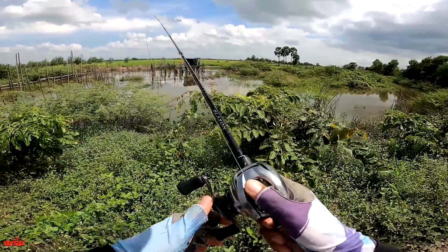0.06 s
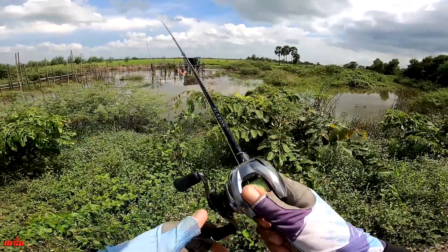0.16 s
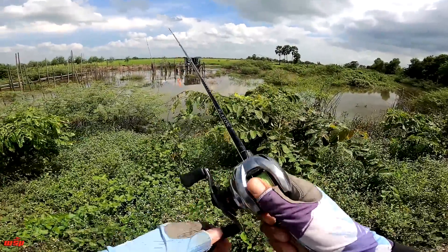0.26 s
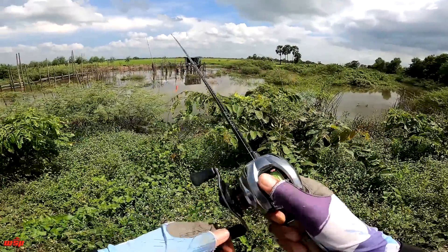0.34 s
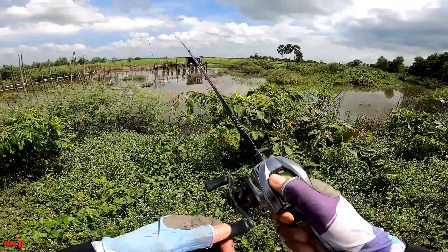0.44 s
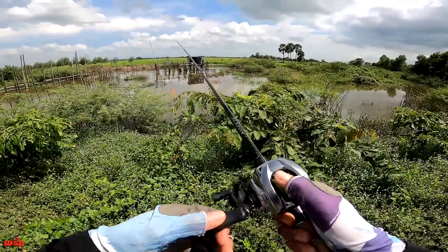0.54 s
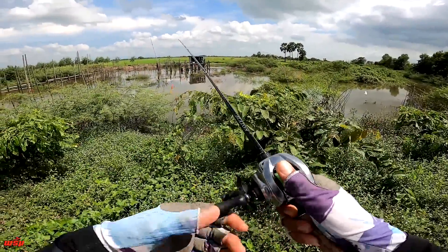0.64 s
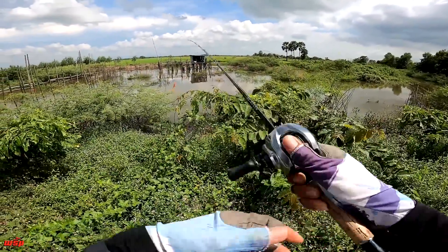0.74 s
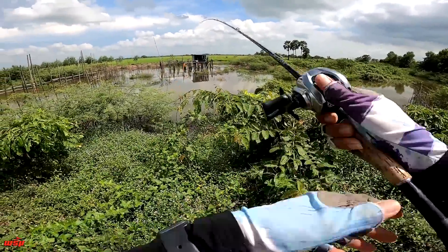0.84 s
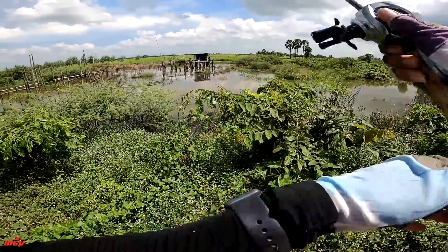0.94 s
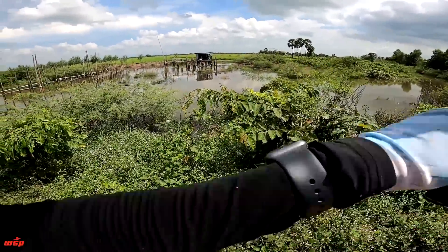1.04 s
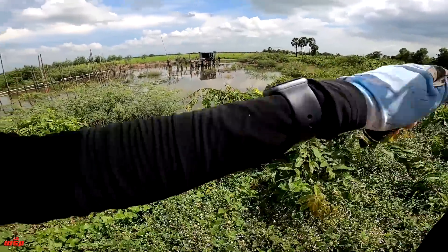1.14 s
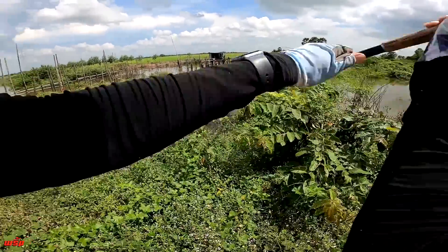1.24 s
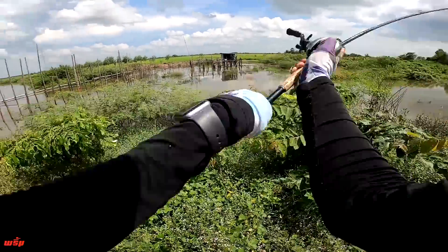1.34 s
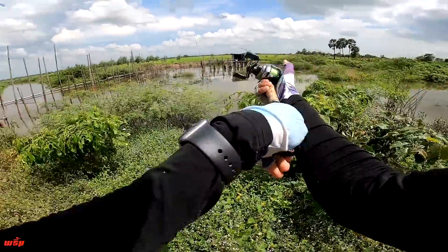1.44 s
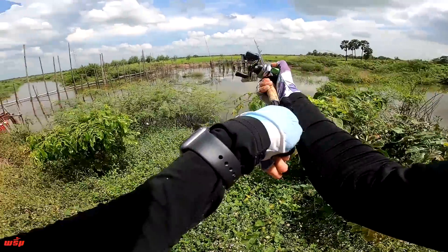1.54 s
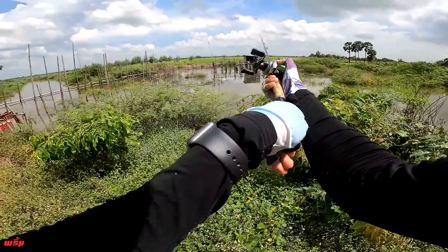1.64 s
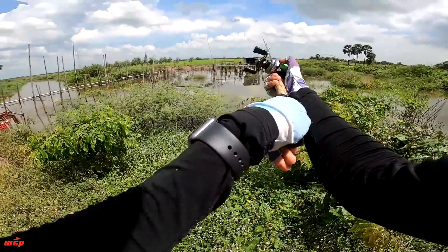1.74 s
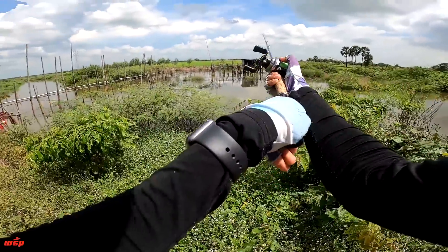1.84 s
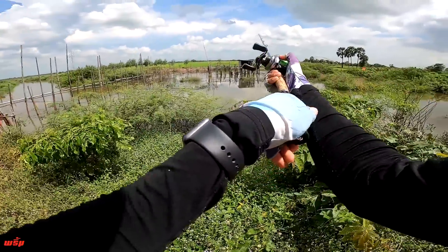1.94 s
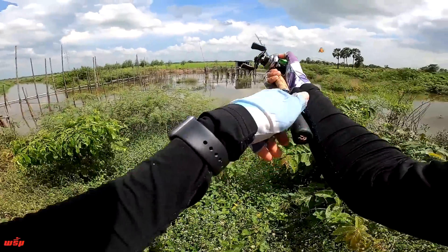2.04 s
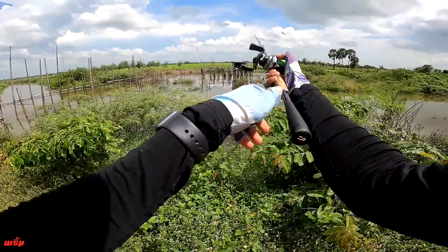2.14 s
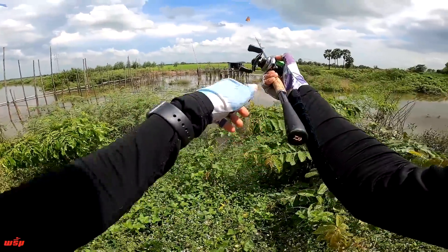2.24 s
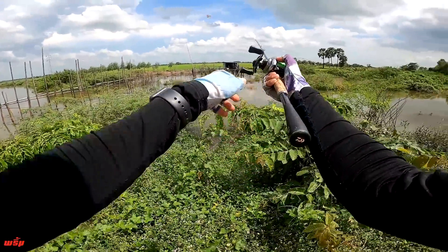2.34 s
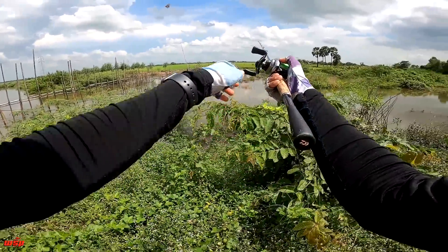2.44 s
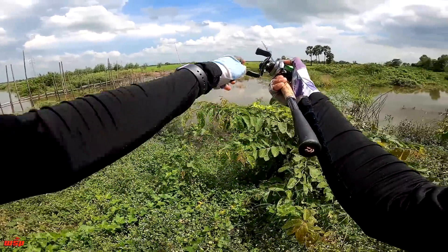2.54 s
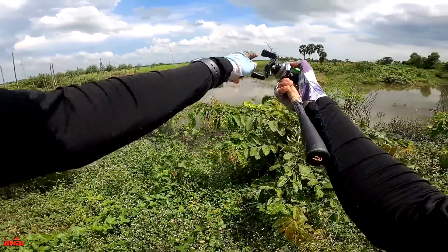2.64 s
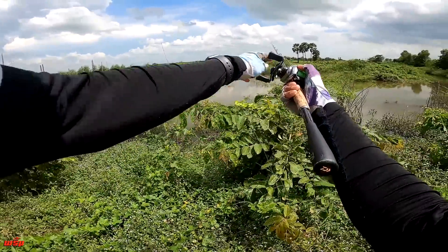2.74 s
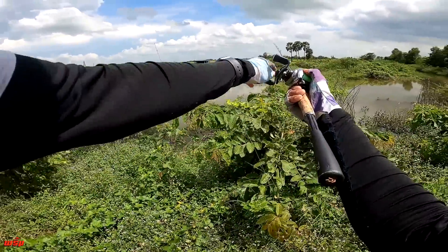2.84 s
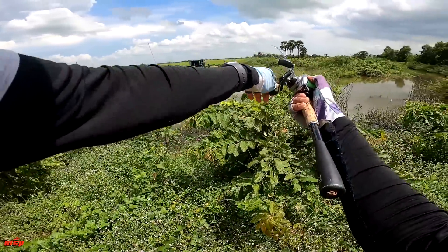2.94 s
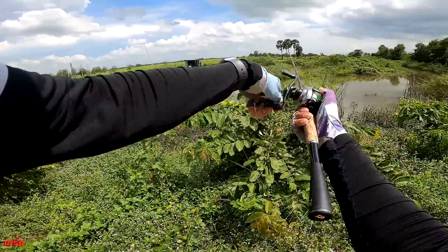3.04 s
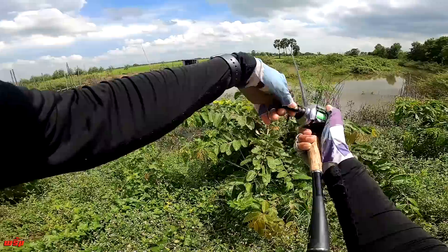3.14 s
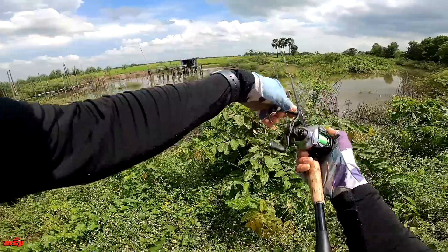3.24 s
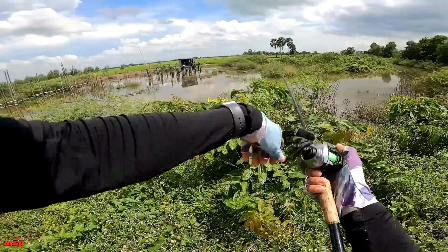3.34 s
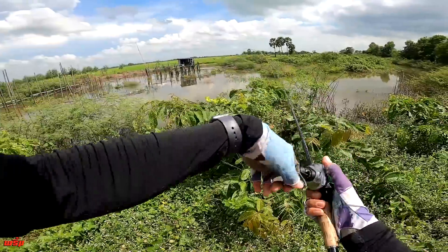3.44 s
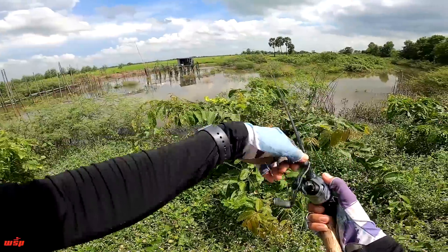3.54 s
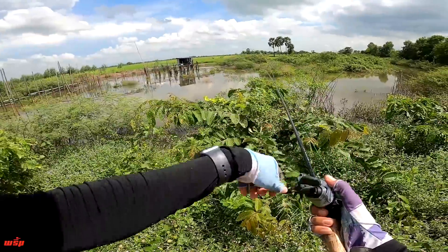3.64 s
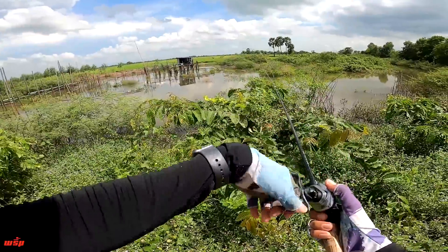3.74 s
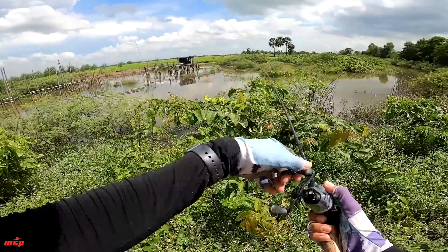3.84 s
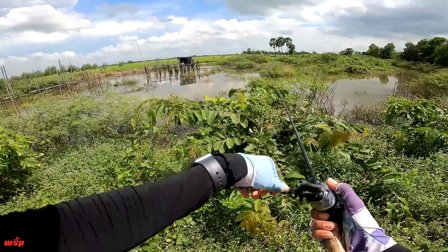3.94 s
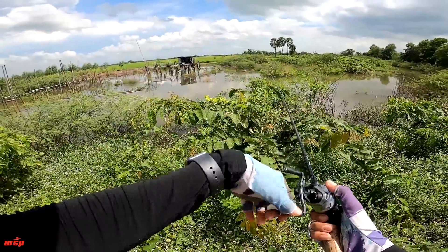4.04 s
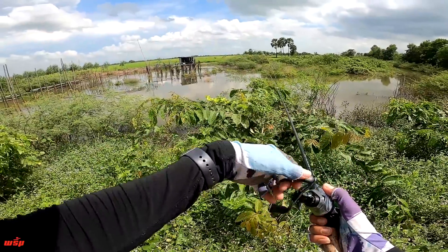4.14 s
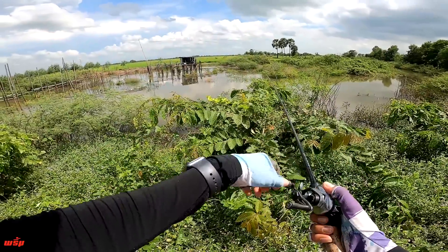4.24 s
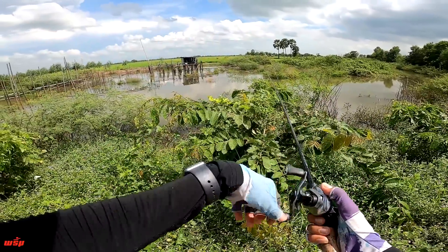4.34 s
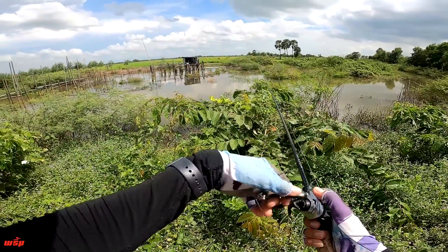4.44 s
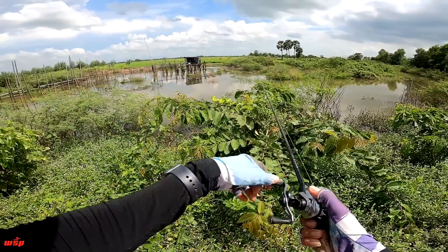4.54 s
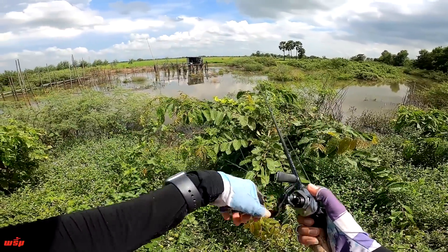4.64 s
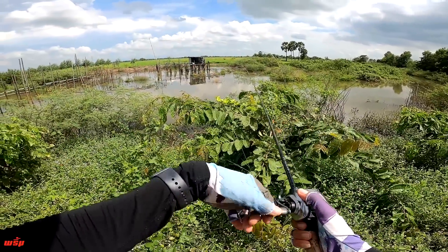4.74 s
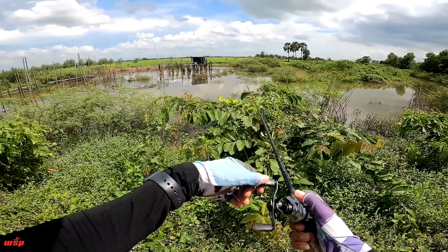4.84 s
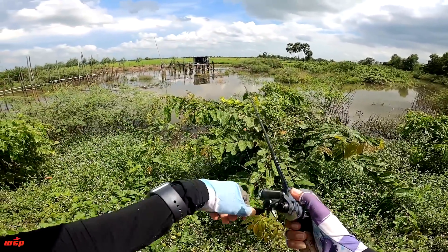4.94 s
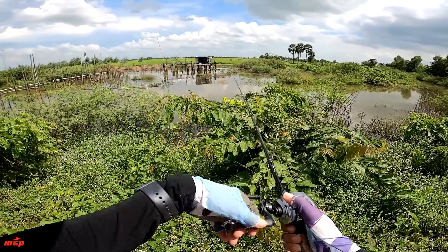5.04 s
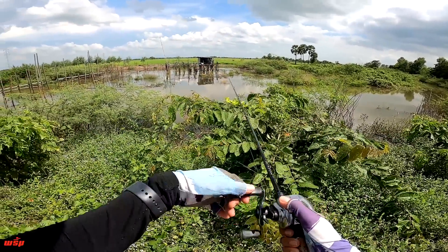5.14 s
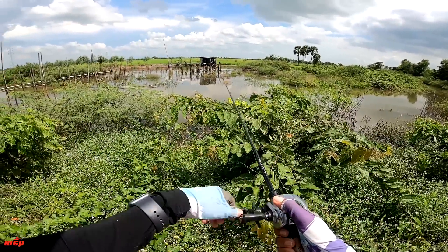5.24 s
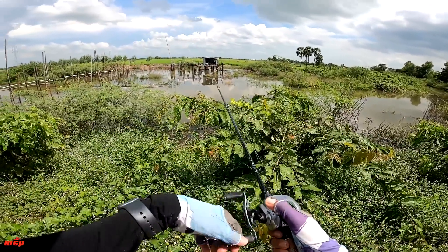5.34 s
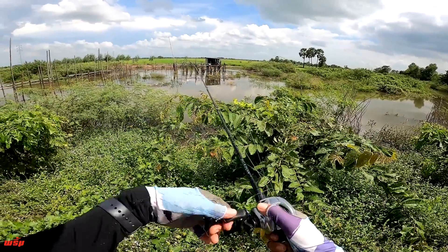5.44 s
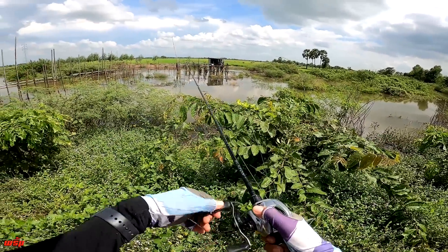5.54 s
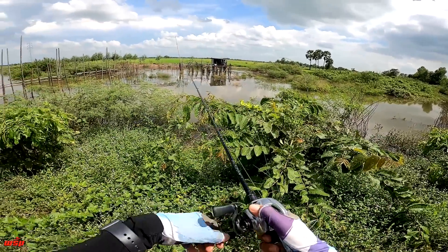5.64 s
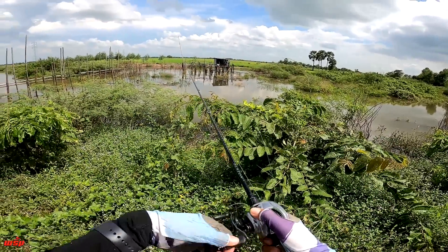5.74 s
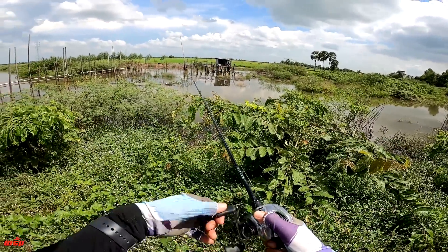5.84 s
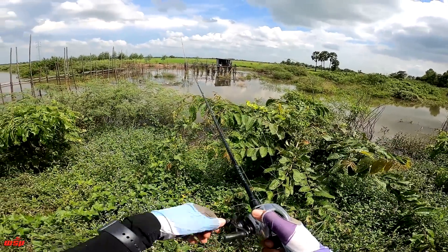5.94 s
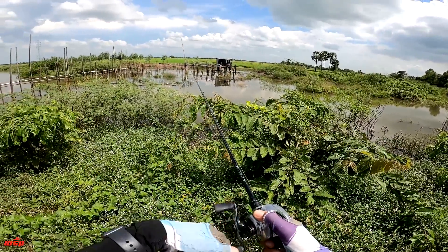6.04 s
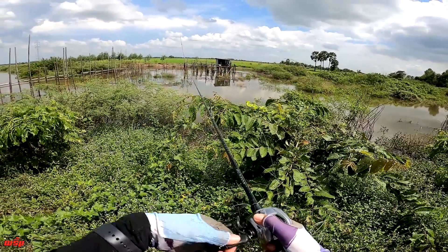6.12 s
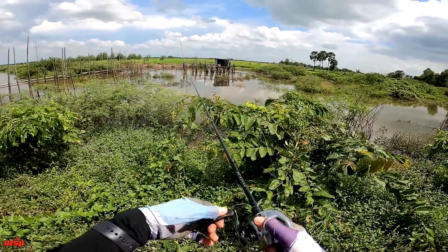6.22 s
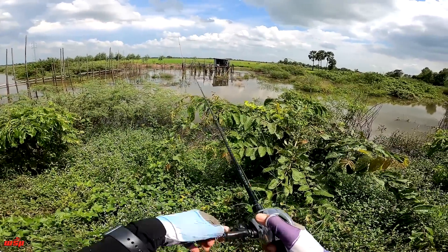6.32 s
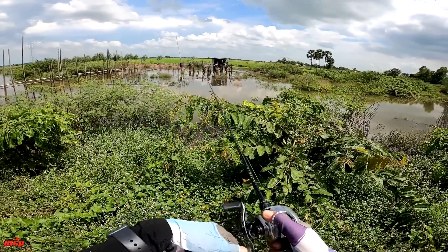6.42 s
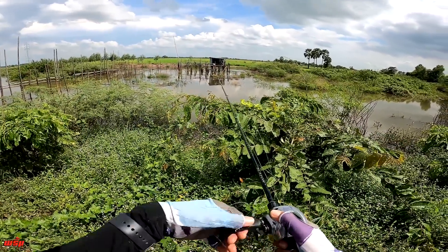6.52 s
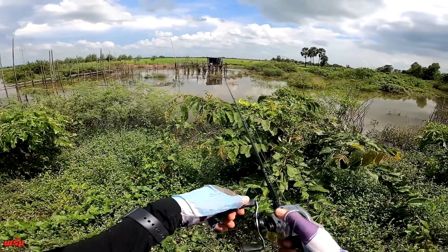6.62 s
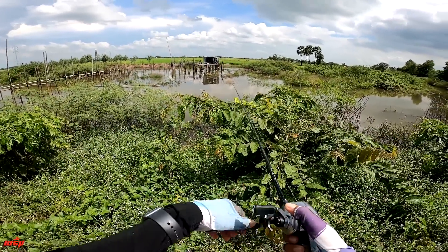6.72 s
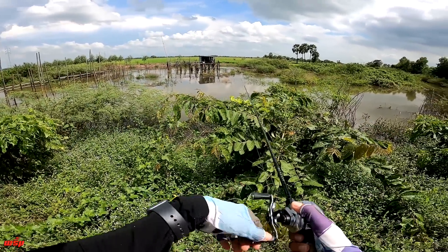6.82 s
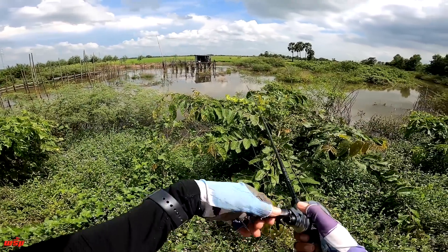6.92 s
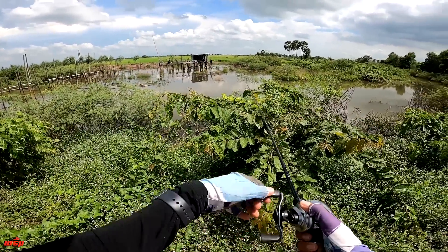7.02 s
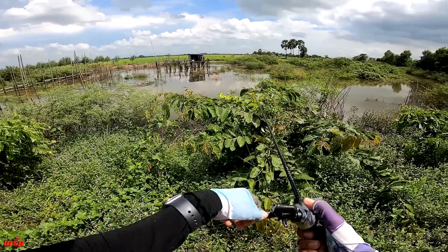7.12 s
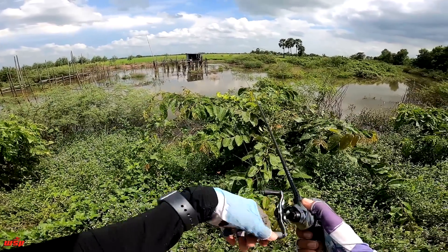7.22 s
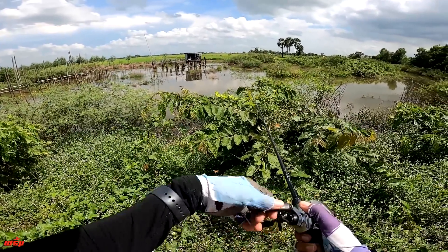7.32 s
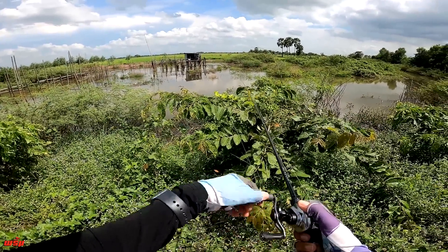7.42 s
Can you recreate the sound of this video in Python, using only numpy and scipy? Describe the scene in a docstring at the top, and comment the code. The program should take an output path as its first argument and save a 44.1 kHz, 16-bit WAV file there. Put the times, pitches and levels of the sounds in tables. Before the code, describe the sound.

Sharp reel clicks, a rod swish and a whirring spool slowing down, then a quiet hissing retrieve with faint birds and breeze by a marsh.

```python
"""Bank of a marsh, microphone at the angler's chest: a lure is cast with a baitcasting reel close in front.
Clicks into free spool and back into gear are short forces that ring the reel's body; the rod's swish is a
rising band of noise; the spool is a slowing hum with rasping line; the slow retrieve hisses and whines.
Sleeves, glove and breeze are shaped noise. Small birds far off are gliding sines, insects narrow drones."""
import sys
import numpy as np
from scipy import signal
from scipy.io import wavfile

SR = 44100
rng = np.random.default_rng(int(sys.argv[2]) if len(sys.argv) > 2 else 0)


def to_wav(sig):
    """Store sig (one row per channel, or 1-D mono) as 16-bit WAV at the path in sys.argv[1].

    Samples outside -1..1 are clipped; the rate is SR.
    """
    pcm = np.clip(np.atleast_2d(sig), -1, 1) * 32767
    pcm = np.round(pcm).astype(np.int16)
    wavfile.write(sys.argv[1], SR, pcm.T)  # frames by channels


N = 329603
TIME = np.arange(N) / SR
CUTOFF_HZ = 15500

# Noise spectra, relative: hz, level_db (per Hz)
# low wind on the microphone
RUMBLE = [(12, -40), (20, -11), (86, 3), (162, -7), (198, 2), (250, -13), (320, -52), (550, -120)]
# dull air and cloth
MURMUR = [(82, -24), (140, -4.5), (178, -2.5), (254, 0), (425, -2), (551, -2.5), (819, -5.5), (1120, -11.5),
          (1500, -12), (1950, -39), (3300, -120)]
# leaves and dry rustle
LEAVES = [(650, -24), (1100, -14.5), (1420, -6.5), (1710, 3.5), (1880, -3), (2430, 3), (2770, -2.5),
          (3510, 1), (4450, 0), (4990, 1), (5850, -9), (8170, -18), (9000, -23), (11700, -59),
          (19800, -120)]
# bright swish of a sleeve
SLEEVE = [(900, -1.5), (2000, 3), (4000, 3), (5500, -2), (7000, 1), (8500, -11.5), (10000, -14.5),
          (12000, -21), (15000, -24)]
# Left-right likeness of the surroundings: hz, correlation (1 = same in both channels)
LIKENESS = [(30, 1), (4000, 1), (8000, 1), (11000, 0.96), (14000, 0.31)]
# Arm movements at the microphone: start_s, end_s, bright_swish_db, dry_rustle_db, dull_rub_db
ARM_MOVES = [(0, 0.29, -67, -56, -46.5), (.55, 0.85, -44.5, -45.5, -47), (1.1, 1.328, -52, -46.5, -55.5),
             (1.58, 2.29, -55, -50.5, -50), (2.64, 2.98, -52, -50.5, -51), (3.27, 3.33, -52, -51, -62),
             (4.607, 4.76, -54, -54.5, -62), (5.007, 5.084, -59, -53.5, -57), (6.85, 7.1, -56, -71, -70)]
# Puffs of wind on the microphone: start_s, end_s, level_db
GUSTS = [(0, .8, -55.5), (2.23, 2.88, -52.5), (2.76, 2.82, -50), (4.2, 4.38, -59.5), (5.35, 5.82, -55),
         (6.28, 7.4, -58)]
# Still air between the puffs
CALM_RUMBLE_DB, CALM_MURMUR_DB, CALM_LEAVES_DB = -60, -55, -53.5

# Spells of winding: start_s, end_s, level_at_start_db
WINDING = [(0, 0.294, -45), (3.215, 7.47, -48)]
WINDING_EASE_DB_PER_S = 3
# Far drones, mostly of insects: start_s, end_s, pitch_hz, width_hz, level_db
INSECTS = [(0, 0.44, 4490, 130, -54.5), (3.85, 5.2, 4510, 130, -58.5), (4.605, 6.7, 2435, 130, -68.5),
           (6.778, 7.267, 2464, 53, -58.5), (7.244, 7.596, 4470, 90, -61), (4.6, 5.2, 545, 5.4, -62),
           (6.753, 7.35, 541, 5.8, -61)]
# Thin, very high squeals: start_s, length_s, start_hz, middle_hz, end_hz, level_db
SQUEALS = [(0, 0.18, 14300, 13700, 14100, -73), (1.83, 0.24, 13000, 13200, 12400, -72),
           (3.63, 0.33, 11700, 11500, 12600, -70.5), (3.88, 0.18, 12400, 11500, 10200, -69),
           (3.63, 0.36, 13300, 13400, 14040, -76), (3.72, 0.22, 12600, 12200, 11700, -69),
           (5.83, .19, 12300, 13600, 11600, -81), (6.08, .29, 11700, 12400, 12300, -81)]
# Glove brushing the crank and the rod butt: start_s, end_s, level_db
BRUSHES = [(0, .09, -46.5), (3.7, 4.1, -55), (5.85, 6.38, -54), (7.27, 7.35, -61.5)]
# Crank taking up load: start_s, end_s, starting_pitch_hz, level_db
CRANK_LOADS = [(0.25, 0.273, 2810, -39), (3.245, 3.326, 2755, -41), (3.47, 3.49, 3160, -43.5),
               (3.976, 4.023, 3350, -53)]
WHINE_RISE_HZ_PER_S = 3000

# Snaps and ticks of the reel: start_s, level_db (over 5 ms), ring_hz, ring_boost_db, chatter_s, frame_boom_db
CLICKS = [(0.2786, -15, 4300, 9, 0.00068, 1), (0.2793, -17, 2700, 11, 0.0011, 6),
          (.343, -40, 1000, 6, 0.0023, 22), (0.374, -43, 2880, 14, .002, 4),
          (.481, -38, 3000, 0, 0.00092, -11), (.521, -27.5, 2500, 7, 0.0012, 7),
          (.5266, -16, 2550, 10, 0.00087, 15), (.5424, -9.5, 1790, 9.5, 0.0014, -1),
          (0.5444, -14, 2020, 4, 0.0016, 1), (0.5463, -14, 3670, 0, 0.00087, 5.5),
          (0.794, -43, 2500, 2, 0.00074, 9), (.824, -16.5, 2940, 4, 0.0026, 4),
          (.845, -37, 2000, 14, 0.0011, 10), (1.3988, -32, 3320, 11, 0.0012, 8),
          (3.002, -34, 2900, 14, 0.0014, -4), (3.01, -32, 2980, 14, .0018, 2),
          (3.054, -30, 4230, 4, 0.0056, -2), (3.0746, -15, 4400, 7, 0.00053, 4),
          (3.085, -17, 4890, 8, 0.00091, 0), (3.0884, -14.5, 4570, 8, 0.0031, 0.5),
          (3.181, -15.5, 2880, 15, 0.00081, -3), (3.1819, -10.5, 3500, 14, 0.00073, -2),
          (3.1837, -13.5, 3000, 9, 0.00048, -4), (3.4515, -36.5, 5160, 8, 0.00073, -8),
          (3.465, -41, 4200, 8, 0.00097, -4), (4.563, -47, 5600, 21, 0.0011, -5)]
# Resonances of the reel's body: pitch_hz, width_hz, level_db (relative)
REEL_MODES = [(1630, 163, -1.5), (1850, 145, 1), (2070, 160, -5.5), (2330, 170, -0.5), (2610, 175, 0),
              (3010, 170, -1), (3630, 194, 3), (4050, 220, -0.5), (4600, 260, -3), (5100, 270, -3.5),
              (5620, 390, -9), (6500, 320, -6.5), (7490, 380, -10), (8430, 580, -13), (11200, 2300, -21.5)]
FRAME_HZ, FRAME_WIDTH_HZ = 850, 124

# The rod's swing: span at full level, then time constants of its rise and fall
SWING_FROM_S, SWING_TO_S, SWING_RISE_S, SWING_FALL_S = 1.4565, 1.502, 0.013, 0.027
# The air tone climbs from low to high pitch around the moment the rod whips through
SWING_LOW_HZ, SWING_HIGH_HZ, WHIP_S, WHIP_LENGTH_S = 780.5, 1983, 1.464, .011

# The spool: launch, top speed, and how fast its sound builds
LAUNCH_S, TOP_TURNS_PER_S, SPOOL_RISE_S = 1.49, 371, 0.0066
# It coasts, is braked harder, and falls silent after the stop: moments and time constants of slowing
BRAKE_S, STOP_S, COAST_DECAY_S, BRAKED_DECAY_S = 1.70, 3.1, 1.0, 0.62
# Hum of the spool: multiple_of_turning_rate, level_db (relative)
SPOOL_ORDERS = [(1, -4), (2, 3), (3, -9), (4, -1.5), (5, 1.5), (6, -2), (7, -5)]
# Resonances of the running spool and its bearings: pitch_hz, width_hz, level_db (relative)
BEARING_MODES = [(1280, 300, 3.5), (1560, 160, 5), (1900, 290, 4), (2700, 580, 1.5), (3960, 630, 3.5),
                 (7100, 1200, -14.5)]
# Loose coils of line flaring against the guides: start_s, end_s, level_db
LINE_FLARES = [(1.85, 1.875, -42.5), (1.925, 1.94, -46), (2.09, 2.27, -46.5), (2.16, 2.2, -42.5)]
# Short bursts of sizzle in the bearings: start_s, end_s, level_db
SIZZLES = [(1.85, 1.89, -61), (2.2, 2.3, -62), (2.54, 2.59, -68), (2.92, 2.96, -65)]

# Falling chirps of far birds: first_note_s, last_note_s, middle_pitch_hz, fall_octaves, level_db (before echo)
CHIRP_RUNS = [(1.925, 2.0, 4050, 0.2, -43), (2.1, 2.405, 3950, .22, -49), (2.699, 3, 3900, .25, -48.5),
              (3.69, 3.77, 4370, .2, -48), (4.35, 4.2, 3660, .2, -49), (5.0, 4.96, 3820, .4, -51),
              (5.265, 5.38, 3600, .8, -47), (5.955, 5.955, 3620, .7, -49), (6.185, 6.4, 3950, .7, -49.5),
              (6.505, 6.695, 3550, .7, -47.5), (7.138, 7.2, 3770, 0.57, -52),
              (7.285, 7.425, 6550, 0.24, -54.5)]
CHIRP_GAP_S, CHIRP_LENGTH_S = .105, .043  # the gap is nominal
# Another call that dips and rises again: start_s, level_db (before echo)
SWOOPS = [(2.201, -47), (3.915, -42.5), (4.501, -45), (5.161, -42.5), (5.975, -46.5)]
SWOOP_LENGTH_S, SWOOP_TOP_HZ, SWOOP_BOTTOM_HZ = 0.042, 5700, 4700
# A far bird's clear, lower whistles: start_s, length_s, start_hz, middle_hz, end_hz, level_db (before echo)
SONG = [(3.33, .066, 1750, 1800, 1700, -56), (3.48, .057, 1780, 1730, 1580, -54),
        (3.57, .068, 1690, 1796, 1720, -53), (3.755, .086, 1696, 1787, 1670, -50),
        (3.955, .094, 1780, 1664, 1630, -52), (4.05, 0.077, 1680, 1740, 1630, -53),
        (4.55, .049, 1630, 1600, 1580, -56), (4.82, .028, 1830, 1900, 2100, -52),
        (5.275, .16, 1900, 2420, 2330, -45), (7.21, 0.055, 3050, 2900, 2730, -56)]
# Dull knocks of the hand on the crank: start_s, level_db (over 5 ms), pitch_hz
KNOCKS = [(4.452, -45, 520), (5.395, -42.5, 554), (5.808, -33.5, 500), (5.988, -39, 514)]


def from_db(db):
    """Decibels to gain."""
    return 10 ** (np.asarray(db) / 20)


def rms_one(x):
    """Scale to unit rms."""
    return x / np.sqrt(np.mean(x ** 2) + 1e-20)


def at_hz(points, hz):
    """Read a spectrum on a log-frequency axis."""
    f, value = np.transpose(points)
    return np.interp(np.log(hz), np.log(f), value)


def drift(rate_hz):
    """Random wandering, unit rms: noise through two equal low-pass poles, made at 1/40 of the sample rate."""
    r = np.exp(-80 * np.pi * rate_hz / SR)
    steps = rng.standard_normal(N // 40 + 2002)
    slow = signal.lfilter([1], [1, -2 * r, r * r], steps)[2000:]  # skip the filter's settling
    return np.interp(np.arange(N) / 40, np.arange(len(slow)), rms_one(slow))


def resonance(x, hz, width_hz):
    """One two-pole resonance with about unit gain at its peak."""
    r = np.exp(-np.pi * width_hz / SR)
    zeros = np.array([1, 0, -1]) * (1 - r * r) / 2
    poles = [1, -2 * r * np.cos(2 * np.pi * hz / SR), r * r]
    return signal.lfilter(zeros, poles, x + 1e-18)


def body(x, modes):
    """A solid body as parallel resonances with alternating signs."""
    return sum((-1) ** k * from_db(db) * resonance(x, hz, width)
               for k, (hz, width, db) in enumerate(modes))


def singing_noise(hz, width_hz):
    """A narrow band of noise that follows a moving pitch."""
    phase = 2 * np.pi * np.cumsum(hz) / SR
    return rms_one(drift(width_hz) * np.cos(phase) + drift(width_hz) * np.sin(phase))


def banded_noise(spectrum, patchy_db):
    """Third-octave bands of stereo noise, flickering partly together and partly apart; unit rms."""
    out, together = 0, drift(7.4)
    lowest, highest = spectrum[0][0], min(spectrum[-1][0], CUTOFF_HZ)
    edges = 2 ** np.arange(np.log2(lowest), np.log2(highest) + 1 / 6, 1 / 3)
    white = rng.standard_normal((2, 2, N))
    for k, (low, high) in enumerate(zip(edges, edges[1:])):
        band = signal.butter(2, [low, high], "band", fs=SR, output="sos")
        mid, side = signal.sosfilt(band, white[k % 2])  # neighbouring bands use different noise
        hz = np.sqrt(low * high)
        alike = np.clip(at_hz(LIKENESS, hz), 0, 1)
        gain = from_db(at_hz(spectrum, hz) + patchy_db * (.5 * together + drift(17.4)))
        stereo = np.sqrt(1 + alike) * mid + np.sqrt(1 - alike) * side * [[1], [-1]]
        out = out + gain * stereo
    return rms_one(out)


def add(out, s, sound):
    """Mix a sound in at time s."""
    start = int(s * SR)
    out[start:start + len(sound)] += sound[:N - start]


def blow(sound, db):
    """Scale a short sound so that its energy equals db held for 5 ms."""
    return from_db(db) * sound * np.sqrt(.005 * SR / np.sum(sound ** 2))


def envelope(start, end, rise_s, fall_s):
    """Full from start to end, with an exponential attack before and release after."""
    before = np.maximum(start - TIME, 0) / rise_s
    after = np.maximum(TIME - end, 0) / fall_s
    return np.exp(-np.minimum(before + after, 20))


def strokes(rows, rise_s, fall_s):
    """Gain of events (start_s, end_s, level_db) that share one attack and release, summed in power."""
    return np.sqrt(sum((from_db(db) * envelope(start, end, rise_s, fall_s)) ** 2 for start, end, db in rows))


def whistles(notes, warble, warble_rate_hz, flutter_db):
    """Each note is a wavering sine that glides through three pitches."""
    out, waver, flutter = np.zeros(N), drift(warble_rate_hz), drift(46)
    for s, length, start_hz, middle_hz, end_hz, db in notes:
        u = np.linspace(0, 1, int(length * SR))
        at = (int(s * SR) + np.arange(len(u))) % N
        glide = np.polyfit([0, .5, 1], [start_hz, middle_hz, end_hz], 2)
        hz = np.polyval(glide, u) * (1 + warble * waver[at])
        level = from_db(db + flutter_db * flutter[at]) * np.sqrt(2 * np.abs(np.sin(np.pi * u)))
        add(out, s, level * np.sin(2 * np.pi * np.cumsum(hz) / SR))
    return out


def winding(rise_s=0.032, fall_s=0.091):
    """Gain of the soft hiss of line being wound in, easing off through each spell."""
    return sum(from_db(db - WINDING_EASE_DB_PER_S * np.maximum(TIME - start, 0))
               * envelope(start, end, rise_s, fall_s) for start, end, db in WINDING)


def surroundings(cloth_rise_s=0.058, cloth_fall_s=0.078, winding_rub_db=-8):
    """Breeze on the microphone and in the leaves; cloth and winding add rustle and rub in the same ranges."""
    moves = np.array(ARM_MOVES)
    swish, rustle, rub = [strokes(zip(moves[:, 0], moves[:, 1], db), cloth_rise_s, cloth_fall_s)
                          for db in moves.T[2:]]
    wound = winding()
    # independent noises add in power
    low = np.hypot(from_db(CALM_RUMBLE_DB), strokes(GUSTS, rise_s=0.056, fall_s=0.068))
    mid = np.hypot(from_db(CALM_MURMUR_DB), np.hypot(rub, from_db(winding_rub_db) * wound))
    high = np.hypot(from_db(CALM_LEAVES_DB), np.hypot(rustle, wound))
    return (low * banded_noise(RUMBLE, patchy_db=2.0) + mid * banded_noise(MURMUR, patchy_db=2.5)
            + high * banded_noise(LEAVES, patchy_db=1.66) + swish * banded_noise(SLEEVE, patchy_db=3.0))


def insects(fade_s=0.066, waver=.012, swell_db=2.0):
    """Narrow drones that waver in pitch and swell in level."""
    out, bend, swell = 0, 1 + waver * drift(4), from_db(swell_db * drift(15))
    for start, end, hz, width, db in INSECTS:
        fade = np.clip(np.minimum(TIME - start, end - TIME) / fade_s, 0, 1)
        out = out + from_db(db) * fade * singing_noise(hz * bend, width)
    return out * swell


def squeals():
    """Thin, very high sines that glide and waver slightly."""
    return whistles(SQUEALS, warble=0.0061, warble_rate_hz=25, flutter_db=2.0)


def brush(hz=300, width_hz=290, grab_db=1.0):
    """Cloth grabs and slips on the handle: dull noise of uneven level."""
    rub = resonance(resonance(rng.standard_normal(N), hz, width_hz), hz, width_hz)
    return strokes(BRUSHES, rise_s=0.13, fall_s=0.11) * from_db(grab_db * drift(25)) * rms_one(rub)


def retrieve(width_hz=220, judder_db=2.5, waver=.025, rise_s=0.04, fall_s=0.043, glide_s=.11):
    """The gears whine roughly, rising in pitch, whenever the crank takes up load."""
    out, bend = 0, 1 + waver * drift(60)
    for start, end, hz, db in CRANK_LOADS:
        pitch = hz + WHINE_RISE_HZ_PER_S * np.clip(TIME - start, -glide_s / 2, glide_s)
        out = out + from_db(db) * envelope(start, end, rise_s, fall_s) * singing_noise(pitch * bend, width_hz)
    return out * from_db(judder_db * drift(70))


def reel_clicks(rise_s=0.00055, creep_db=-22, creep_s=0.0032, tail_db=-13, tail_t60_s=0.1,
                frame_db=-7, thud_db=-13.5, thud_hz=330):
    """A pawl scrapes up to its catch, strikes, chatters and leaves loose parts buzzing; all rings the reel."""
    out, lead = np.zeros(N), SR // 100  # room for the scrape before the strike
    t = (np.arange(SR // 10) - lead) / SR
    after = np.maximum(t, 0)
    contact = 1 - np.exp(-after / rise_s)
    strike = 1. * (t == 0)
    for s, db, ring_hz, boost_db, chatter_s, boom_db in CLICKS:
        noise = rng.standard_normal((3, len(t)))
        creep = noise[0] * np.exp(-np.abs(t) / creep_s)
        chatter = noise[1] * contact * np.exp(-after / chatter_s)
        buzz = noise[2] * contact * from_db(-60 * after / tail_t60_s)
        force = blow(creep, creep_db) + blow(strike, 0) + blow(chatter, 0) + blow(buzz, tail_db)
        shell = body(force, REEL_MODES)
        shell = shell + (from_db(boost_db) - 1) * resonance(shell, ring_hz, 700)
        frame = from_db(frame_db + boom_db) * resonance(force, FRAME_HZ, FRAME_WIDTH_HZ)
        thud = from_db(thud_db) * resonance(force, thud_hz, 560)
        add(out, s - lead / SR, blow(shell + frame + thud, db))
    return out


def swing(tone_db=-19, hiss_db=-17.5, early_hiss_db=-7, tone_width_hz=330, tone_rise_s=.003,
          gust_db=-12, rasp_db=4.0, stir_db=-41, stir_s=0.098):
    """Vortices shed by the rod rise in pitch with its speed, while the line rips off the spool."""
    speed = .5 + .5 * np.tanh((TIME - WHIP_S) / (2 * WHIP_LENGTH_S))
    hz = SWING_LOW_HZ + (SWING_HIGH_HZ - SWING_LOW_HZ) * speed
    level = envelope(SWING_FROM_S, SWING_TO_S, SWING_RISE_S, SWING_FALL_S)
    stir = from_db(stir_db) * envelope(SWING_FROM_S, SWING_TO_S, stir_s, stir_s)  # fainter, longer skirt
    rip = rng.standard_normal(N) * from_db(rasp_db * drift(240))
    # pitch_hz, width_hz, level_db
    hiss_modes = [(1120, 960, -6), (2100, 600, -0.5), (2800, 560, 0.0), (3730, 560, 3.0),
                  (4700, 1100, -4), (6930, 1750, -10), (11500, 2300, -25.5)]
    hiss = rms_one(body(rip, hiss_modes))
    gust = from_db(gust_db) * rms_one(resonance(rng.standard_normal(N), 216, 410))
    tone_level = from_db(tone_db) * envelope(SWING_FROM_S, SWING_TO_S, tone_rise_s, SWING_FALL_S)
    air_level = from_db(hiss_db + early_hiss_db * (1 - speed)) * level + stir
    return tone_level * singing_noise(hz, tone_width_hz) + air_level * (hiss + gust)


def spool_speed():
    """Share of top speed: the spool coasts from the launch and slows faster once it is braked."""
    coasting = np.clip(TIME - LAUNCH_S, 0, BRAKE_S - LAUNCH_S)
    braked = np.maximum(TIME - BRAKE_S, 0)
    return np.exp(-coasting / COAST_DECAY_S - braked / BRAKED_DECAY_S)


def spinning(db, power, stop_fall_s=.05):
    """Gain of a sound that follows a power of the spool's speed."""
    return from_db(db) * spool_speed() ** power * envelope(LAUNCH_S, STOP_S, SPOOL_RISE_S, stop_fall_s)


def spool(wobble=.006, flutter_db=3.0, throb=0.25, slap_db=2.5, hum_db=-36, hum_power=3.4,
          line_db=-32, line_power=4.3, jerk_db=7, jerk_s=0.016):
    """The unbalanced spool hums as it slows, hardest at the first jerk; line leaves it in one rasp a turn."""
    turns_per_s = TOP_TURNS_PER_S * spool_speed() * (1 + wobble * drift(38.2))
    angle = 2 * np.pi * np.cumsum(turns_per_s) / SR
    hum = sum(from_db(db + flutter_db * drift(25))
              * np.sin(round(multiple) * angle + rng.uniform(0, 2 * np.pi)) for multiple, db in SPOOL_ORDERS)
    jerk = from_db(jerk_db * envelope(0, LAUNCH_S, jerk_s, jerk_s))
    rasp = rng.standard_normal(N) * (1 + throb * np.cos(angle)) * from_db(slap_db * drift(65))
    line_level = spinning(line_db, line_power) + strokes(LINE_FLARES, rise_s=0.009, fall_s=0.01)
    line = line_level * rms_one(body(rasp, BEARING_MODES))
    return jerk * spinning(hum_db, hum_power) * rms_one(hum) + line


def bearings(whizz_hz=7200, whizz_width_hz=330, whizz_db=-51, whizz_power=1.24,
             sizzle_hz=11150, sizzle_width_hz=380, sizzle_db=-74, sizzle_power=.7):
    """The balls ring their races at fixed pitches while the spool runs, with bursts of sizzle."""
    whizz = spinning(whizz_db, whizz_power) * singing_noise(np.full(N, whizz_hz), whizz_width_hz)
    sizzle_level = spinning(sizzle_db, sizzle_power) + strokes(SIZZLES, rise_s=0.018, fall_s=0.013)
    return whizz + sizzle_level * singing_noise(np.full(N, sizzle_hz), sizzle_width_hz)


def chirps():
    """Notes of the far birds: evenly spaced falling chirps, and single swoops."""
    notes = []
    for first, last, hz, fall, db in CHIRP_RUNS:
        half_fall = 2 ** (fall / 2)
        count = 1 + round(abs(last - first) / CHIRP_GAP_S)
        for s in np.linspace(first, last, count):
            notes.append((s, CHIRP_LENGTH_S, hz * half_fall, hz, hz / half_fall, db))
    for s, db in SWOOPS:
        notes.append((s, SWOOP_LENGTH_S, SWOOP_TOP_HZ, SWOOP_BOTTOM_HZ, SWOOP_TOP_HZ, db))
    return notes


def birds(echo_db=-3, echo_t60_s=0.18, husky=0.061):
    """Husky chirps and clear whistles, smeared by scattering from the bushes."""
    calls = whistles(chirps(), warble=husky, warble_rate_hz=380, flutter_db=2.5)
    calls = calls + whistles(SONG, warble=0.011, warble_rate_hz=120, flutter_db=2.5)
    t = TIME[:SR // 2]
    scatter = rng.standard_normal(len(t)) * from_db(-60 * t / echo_t60_s)
    echo = signal.fftconvolve(calls, scatter / np.linalg.norm(scatter))[:N]
    return 0.66 * calls + from_db(echo_db) * echo


def knocks(soft_s=0.0047, width_hz=110, upper_db=-5):
    """Soft contacts of the glove on the crank ring a low mode and the frame."""
    out, t = np.zeros(N), TIME[:SR // 10]
    for s, db, hz in KNOCKS:
        force = rng.standard_normal(len(t)) * np.exp(-t / soft_s)
        frame = from_db(upper_db) * resonance(force, FRAME_HZ, FRAME_WIDTH_HZ)
        add(out, s, blow(resonance(force, hz, width_hz) - frame, db))
    return out


def scene(contact_hz=9500):
    """Reel, rod and calls sit in the centre of the wide surroundings; plastic softens the top of the clicks."""
    soften = signal.butter(2, contact_hz, fs=SR, output="sos")
    clicks = signal.sosfilt(soften, reel_clicks())
    reel = brush() + retrieve() + clicks + spool() + bearings() + knocks()
    return surroundings() + insects() + squeals() + reel + swing() + birds()


def record(dry, split_hz=12000, split_db=-4, hiss_db=-88):
    """Top treble and faint noise are added with opposite signs left and right; peaks round, the top is cut."""
    high_pass = signal.butter(8, split_hz, "high", fs=SR, output="sos")
    treble = signal.sosfilt(high_pass, dry.mean(axis=0)) * drift(300)
    hiss = rms_one(signal.lfilter([1], [1, -.97], rng.standard_normal(N)))
    side = from_db(split_db) * treble + from_db(hiss_db) * hiss
    pair = dry + side * [[1], [-1]]
    rounded = pair / (1 + (pair / .86) ** 8) ** (1 / 8)
    top_cut = signal.cheby2(18, 95, CUTOFF_HZ + 800, fs=SR, output="sos")
    return signal.sosfilt(top_cut, rounded)


dry = scene()
out = record(dry)
to_wav(out)
```